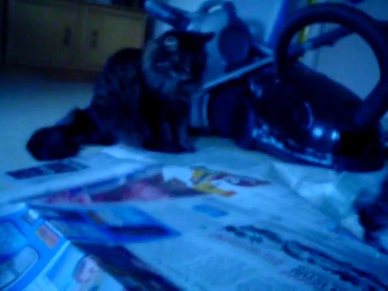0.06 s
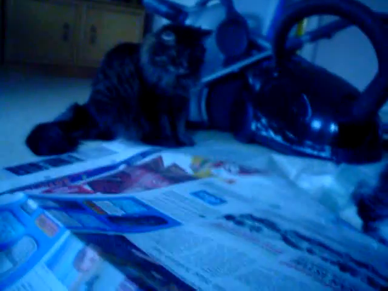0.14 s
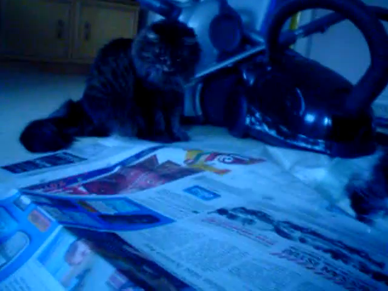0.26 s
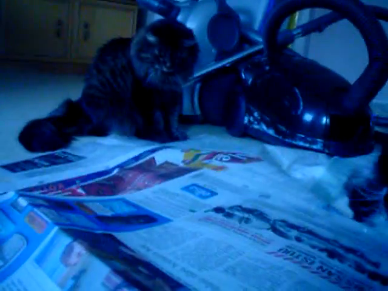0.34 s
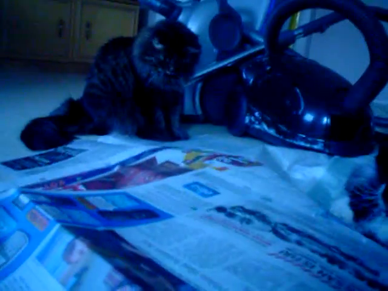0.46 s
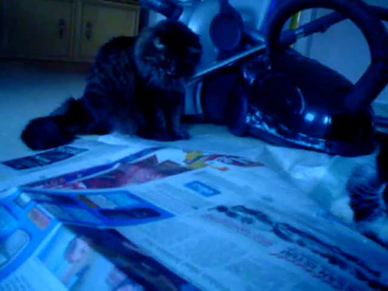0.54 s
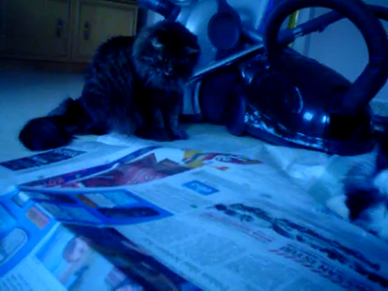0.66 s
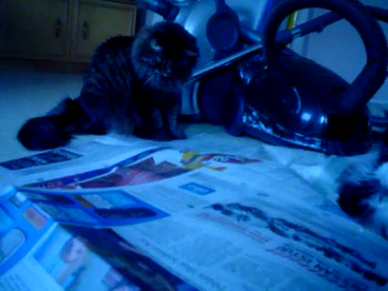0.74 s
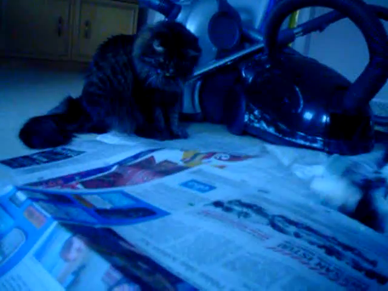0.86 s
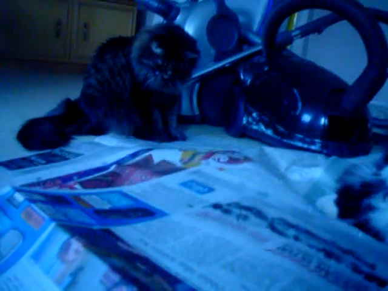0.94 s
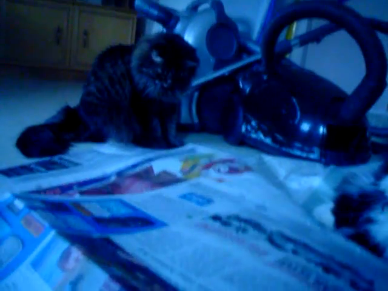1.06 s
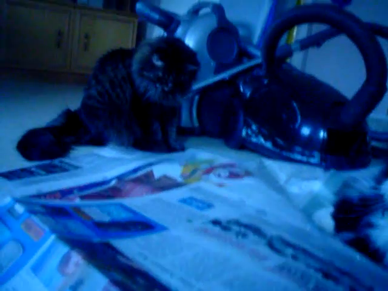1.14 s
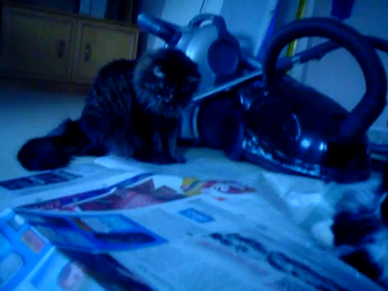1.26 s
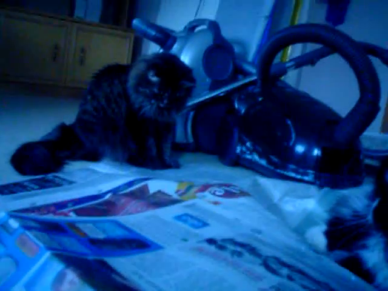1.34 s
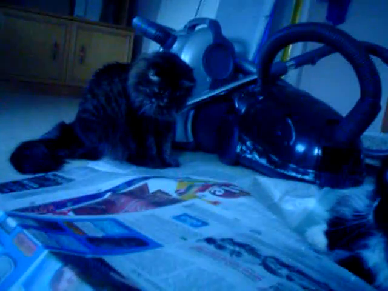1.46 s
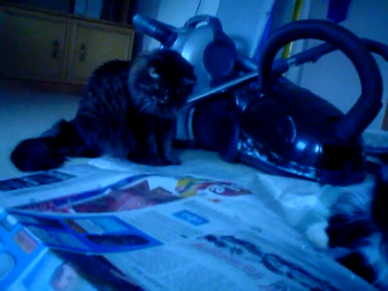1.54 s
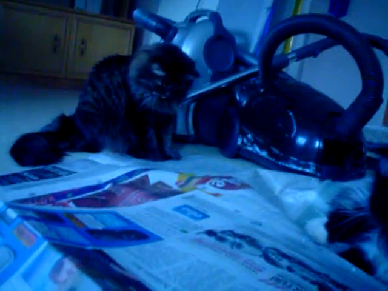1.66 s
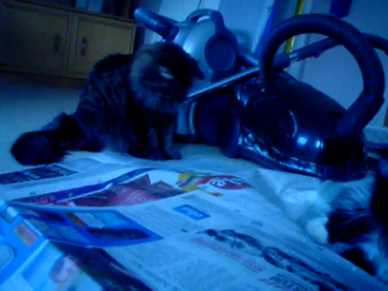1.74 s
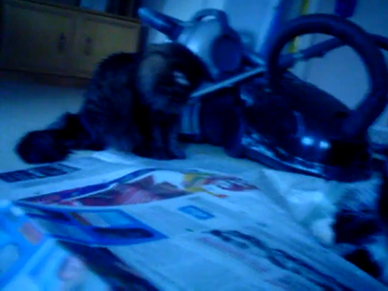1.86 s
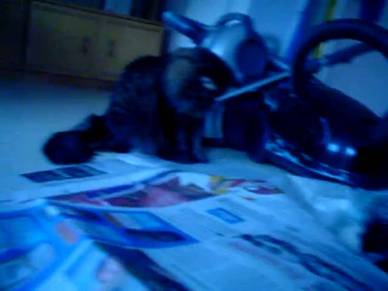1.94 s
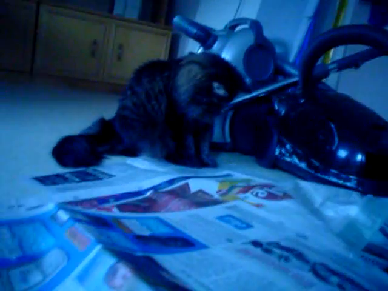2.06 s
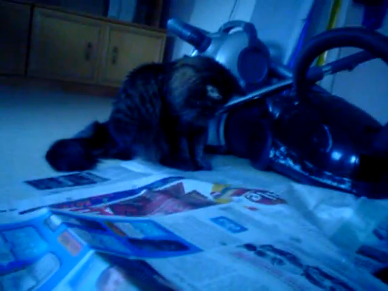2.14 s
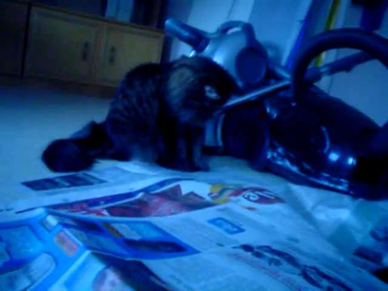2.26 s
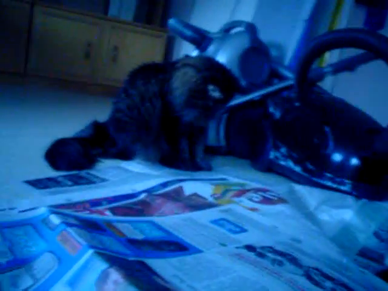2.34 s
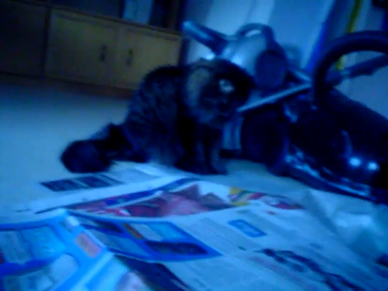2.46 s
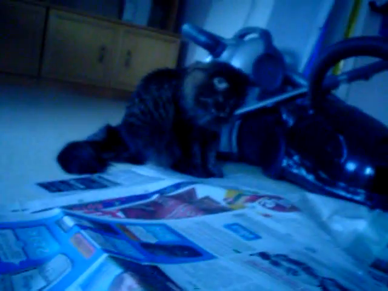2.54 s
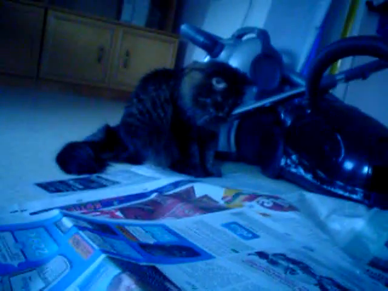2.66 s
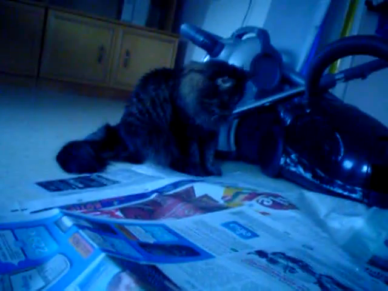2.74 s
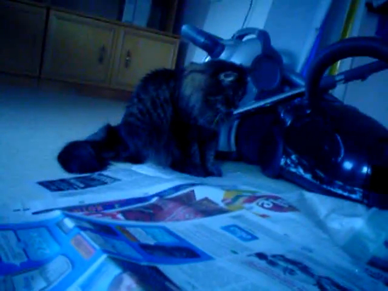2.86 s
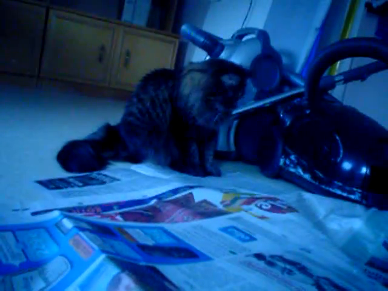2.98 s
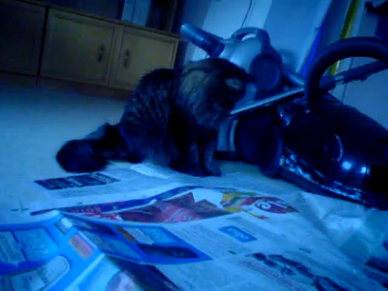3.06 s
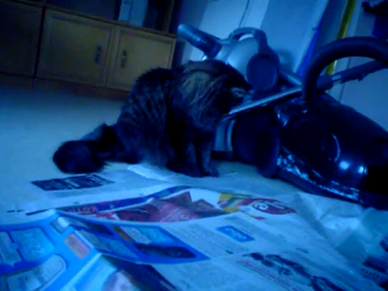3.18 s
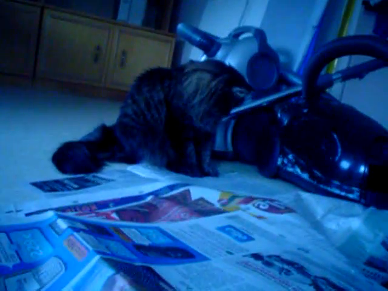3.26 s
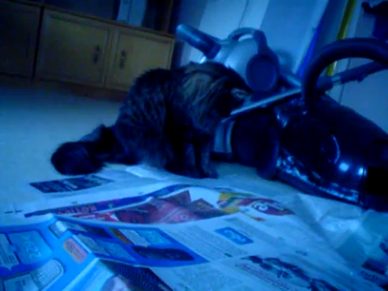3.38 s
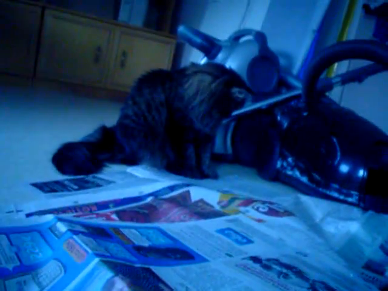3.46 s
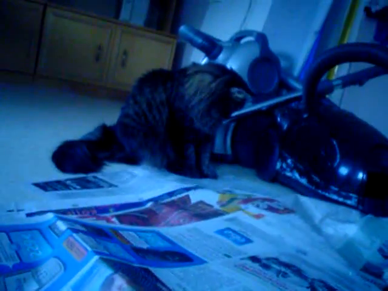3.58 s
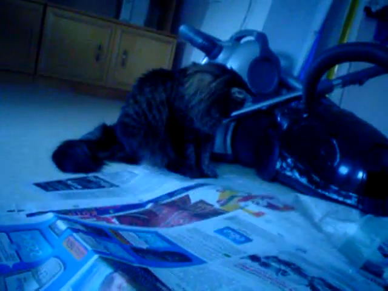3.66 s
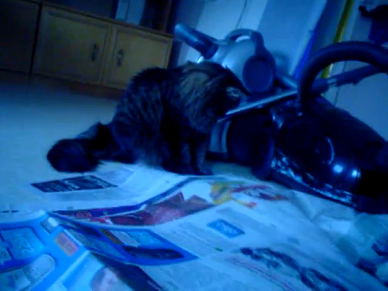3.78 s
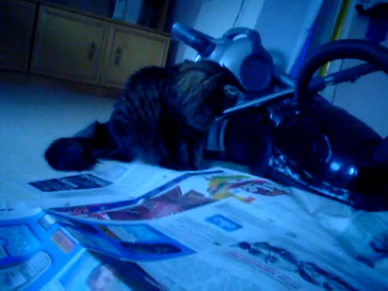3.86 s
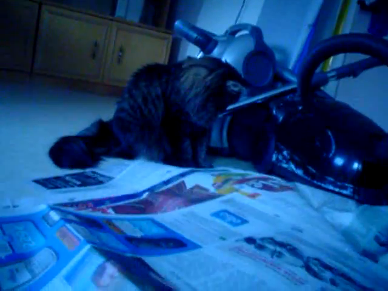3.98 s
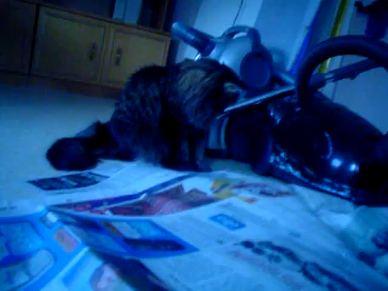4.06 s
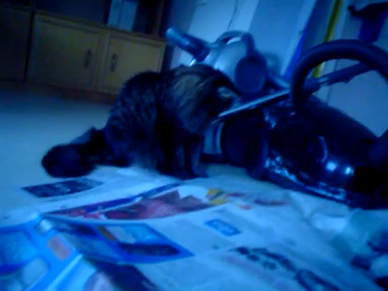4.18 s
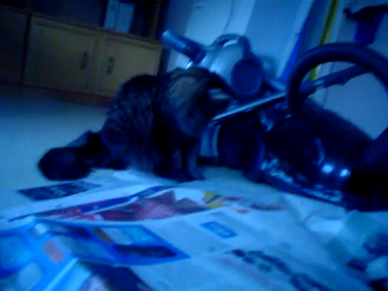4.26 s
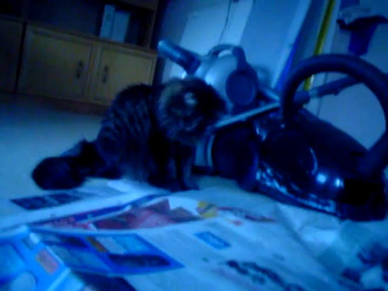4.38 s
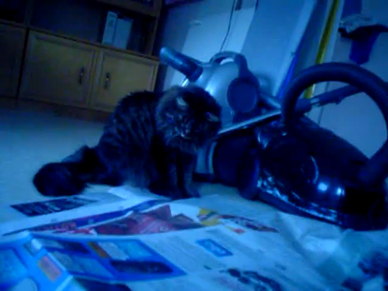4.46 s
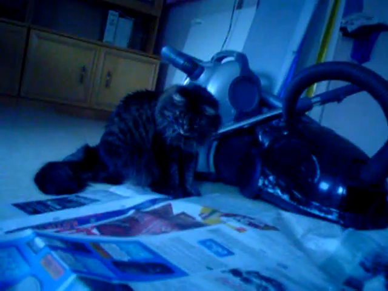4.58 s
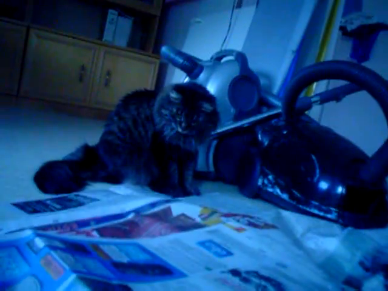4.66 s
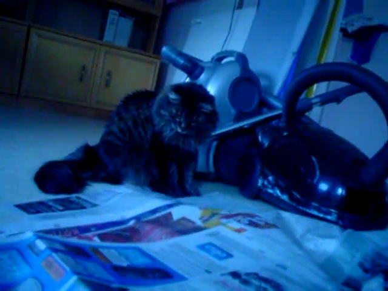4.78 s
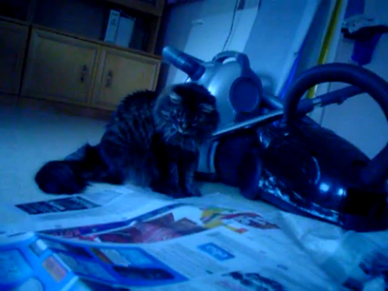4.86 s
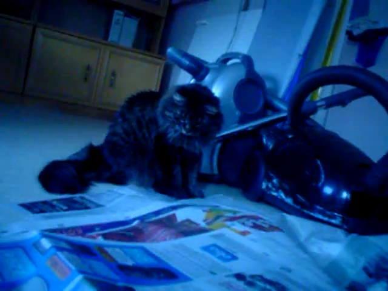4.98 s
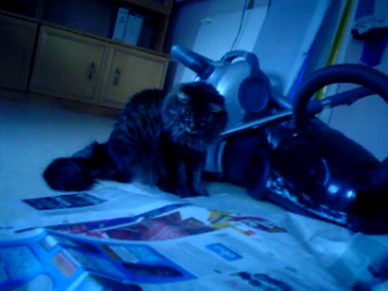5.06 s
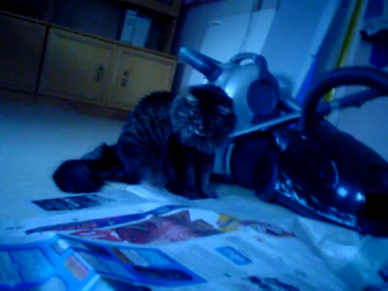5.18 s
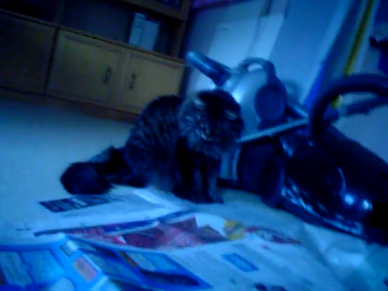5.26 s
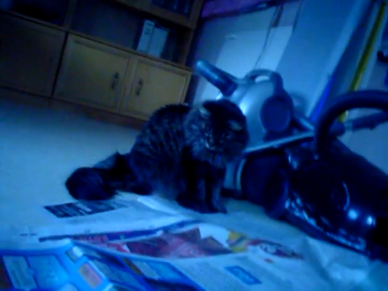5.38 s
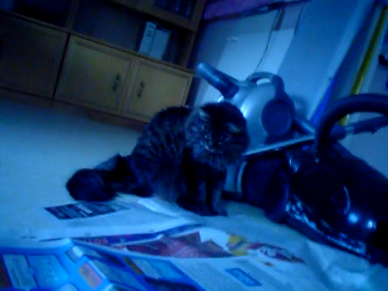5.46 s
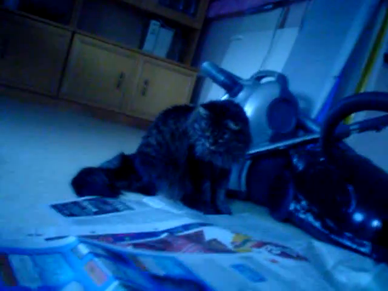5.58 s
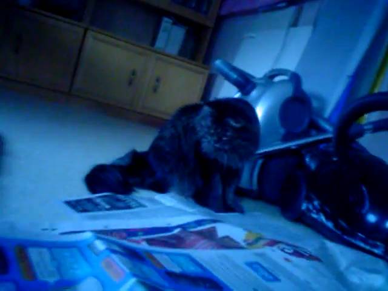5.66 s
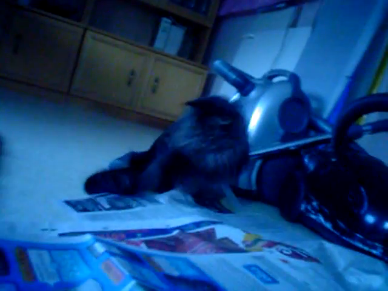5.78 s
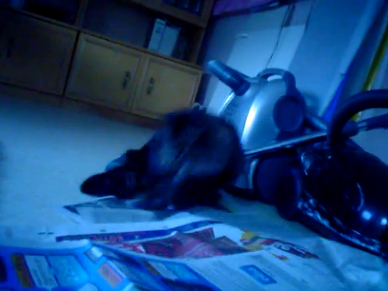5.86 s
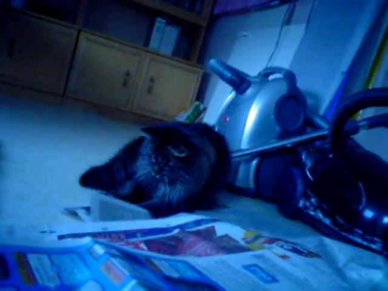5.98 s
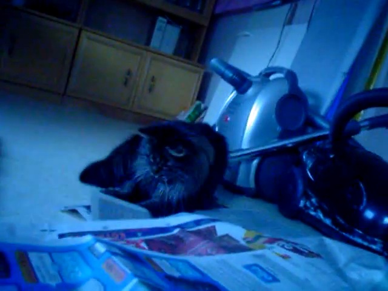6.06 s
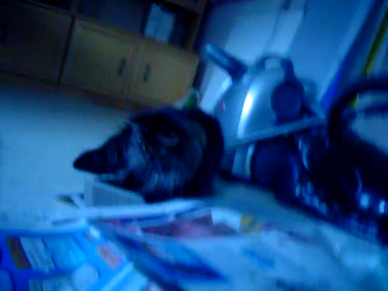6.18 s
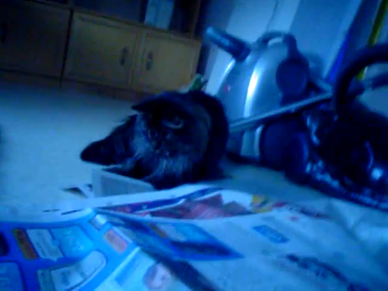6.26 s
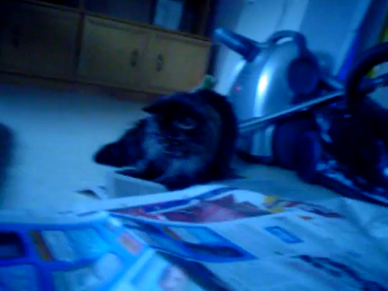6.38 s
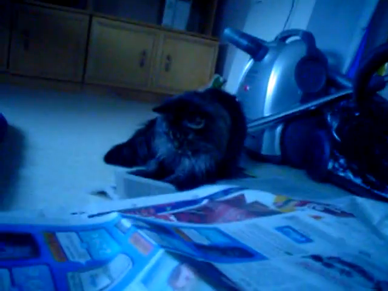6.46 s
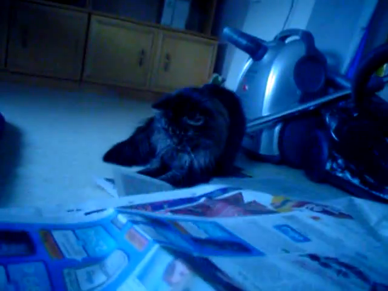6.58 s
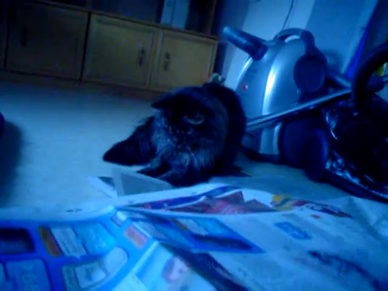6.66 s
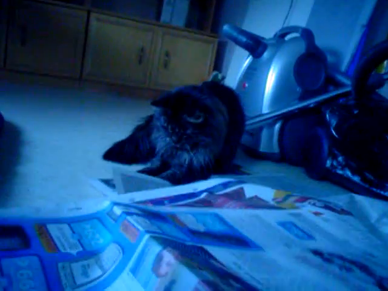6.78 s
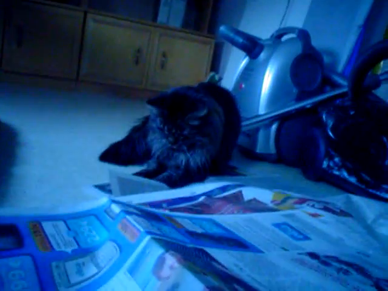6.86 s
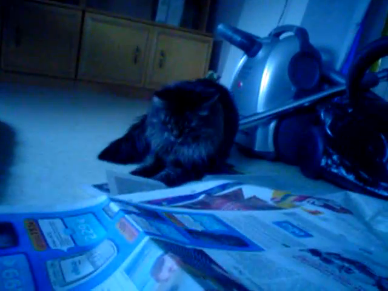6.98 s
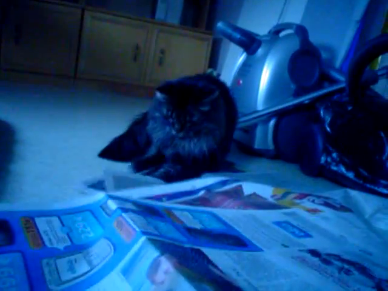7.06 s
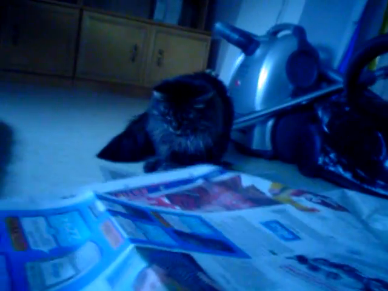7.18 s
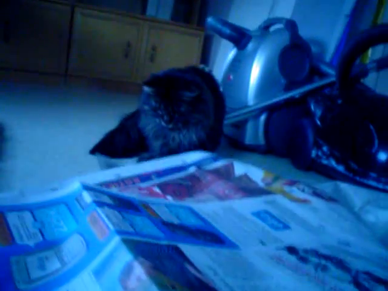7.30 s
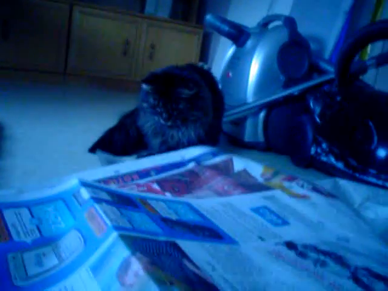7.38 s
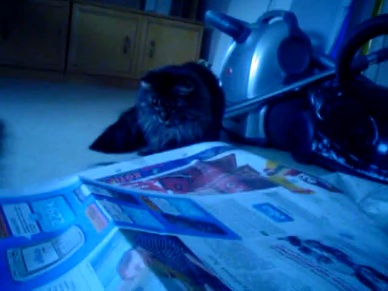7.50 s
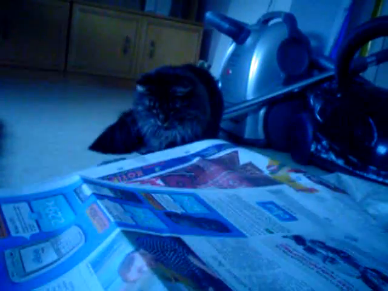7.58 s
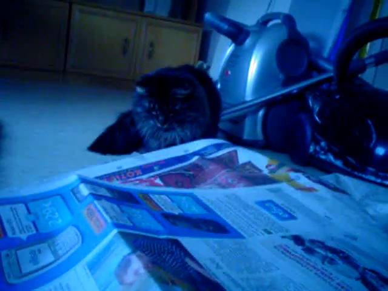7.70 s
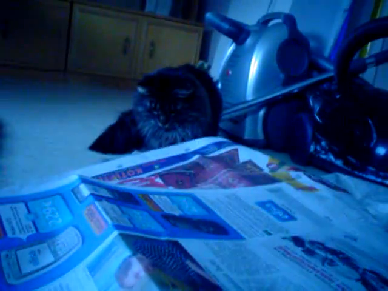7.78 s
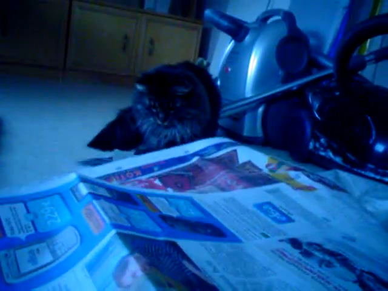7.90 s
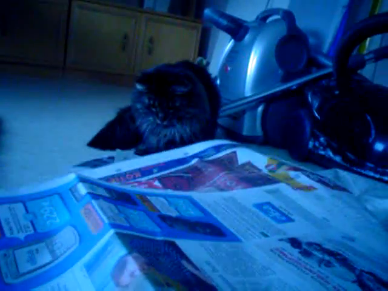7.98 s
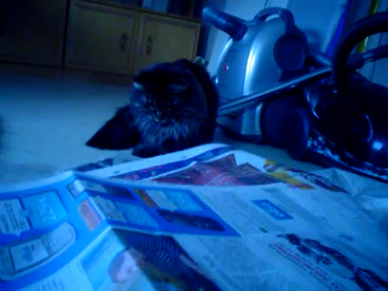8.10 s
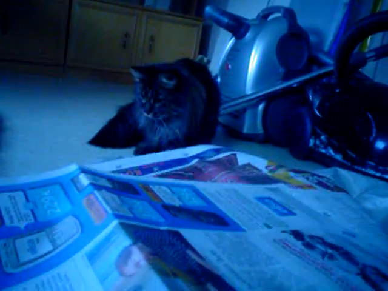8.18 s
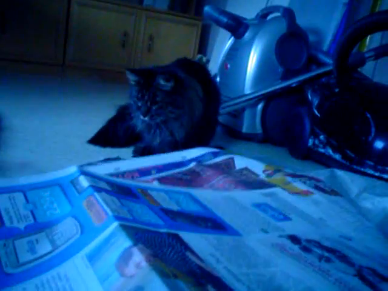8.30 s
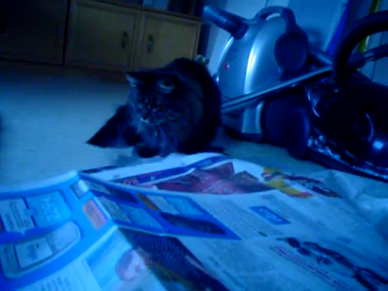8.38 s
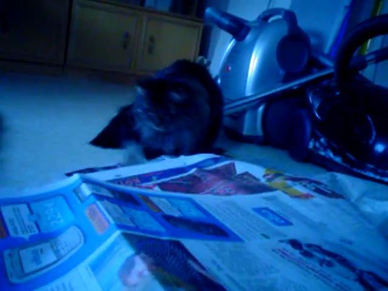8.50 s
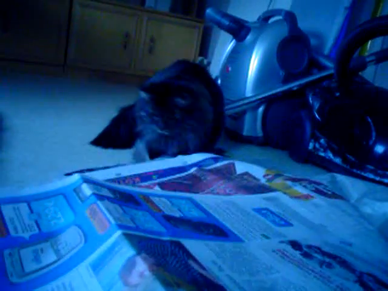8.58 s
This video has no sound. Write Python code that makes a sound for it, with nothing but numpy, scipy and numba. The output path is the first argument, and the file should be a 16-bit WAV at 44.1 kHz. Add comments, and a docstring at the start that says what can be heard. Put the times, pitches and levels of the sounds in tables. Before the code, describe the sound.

A quiet room with soft, low microphone hiss and a short, dry room answer. Close by, newspaper sheets crackle on a hard floor. From 0 to 1 s there are brisk rustles and sharp snaps, strongest around 0.3 s. From 1 to 3.4 s the movement thins to light sliding and isolated small ticks; a faint, thin, mid-pitched whine runs from about 2.1 to 3.4 s, sagging twice near its end. At 3.6 to 4.3 s a denser crunching burst arrives, then smaller ticks and rustles with soft, dull paw thuds around 4.7 to 5.2 s. At about 5.9 s comes the loudest, brightest cluster of tearing snaps, slightly overloaded, over padded thuds. Uneven crackles follow, growing strong again from 6.7 s, with hard snaps near 7.55, 7.65, 8.1 and 8.45 s, and rustling continues to the end at about 8.6 s.

```python
"""Quiet room, hard floor: loose newspaper sheets are pushed about and pawed at close to a small microphone.
Buckling creases are dense tiny ringing grains plus noise; single loud snaps are torn noise through resonances.
Wide sheets drone below, creases hiss above; soft paw falls thud and a faint sine whine passes.
A short noise tail answers as the room; the microphone bends the loudest bursts lopsidedly."""
import sys
import numpy as np
from scipy import signal
from scipy.fft import rfft, irfft
from scipy.io import wavfile
from scipy.ndimage import uniform_filter1d
from numba import njit

SR = 44100
rng = np.random.default_rng(int(sys.argv[2]) if len(sys.argv) > 2 else 0)


def unload_audio(sound):
    """Save the sound as a 16-bit wav file, at the path given as the first command line argument."""
    columns = np.transpose(np.atleast_2d(sound))
    # keep every value between -1 and 1, then stretch to whole-number steps
    steps = np.round(np.clip(columns, -1, 1) * 32767)
    wavfile.write(sys.argv[1], SR, steps.astype(np.int16))


N = 381018  # samples


def undb(db):
    """Amplitude ratio of a level in dB."""
    return 10 ** (np.asarray(db) / 20)


def unit(x):
    """Scale to rms 1."""
    return x / np.sqrt(np.mean(x ** 2))


def sos_filter(x, order, cut_hz, kind="low"):
    """Butterworth filter."""
    return signal.sosfilt(signal.butter(order, cut_hz, kind, fs=SR, output="sos"), x)


def colour(x, points):
    """Minimum-phase filter with the gain of (Hz, dB) points, from the folded cepstrum."""
    hz, db = np.transpose(points)
    grid_hz = np.maximum(np.arange(2049) * SR / 4096, 1)
    log_gain = np.interp(np.log(grid_hz), np.log(hz), db) * np.log(10) / 20
    cepstrum = irfft(log_gain)
    cepstrum[1:2048] *= 2
    cepstrum[2049:] = 0
    impulse = irfft(np.exp(rfft(cepstrum)))[None, :2048]
    return signal.fftconvolve(np.atleast_2d(x), impulse, axes=1)[:, :np.shape(x)[-1]]


# band limits: body | crackle | hiss [f/Hz]
BAND_EDGES_HZ = (1420, 5000)


def bands(x):
    """Low-, band- and high-pass three rows into body, crackle and hiss."""
    low_hz, high_hz = BAND_EDGES_HZ
    body = sos_filter(x[0], 3, low_hz)
    crackle = sos_filter(x[1], 3, (low_hz, high_hz), "band")
    hiss = sos_filter(x[2], 3, high_hz, "high")
    return np.array([body, crackle, hiss])


def walk(rate_hz):
    """Random levels held 1 / rate_hz s and slewed; rms 1."""
    hold = int(SR / rate_hz)
    steps = np.repeat(rng.standard_normal(N // hold + 1), hold)
    return unit(uniform_filter1d(steps, hold // 2 + 1)[:N])


# sheets sliding lightly between pushes: [t/s, crackle level/dB]
SLIDE_LEVELS = [(0.0, -39), (0.45, -46), (0.85, -46.5), (1.5, -53.5), (2.3, -48.5), (2.9, -59), (3.5, -50),
                (4.0, -61), (4.48, -56.5), (4.6, -46.5), (5.0, -65.5), (5.75, -49.5), (6.2, -50),
                (6.45, -54.5), (7.0, -41.5), (7.8, -57.5), (8.05, -42), (8.6, -42)]
# paw pushes: [peak t/s, crackle level/dB, swell by 10 dB/s, fade by 10 dB/s]; times below 5 ms act as 5 ms
PAW_PUSHES = [(0.286, -28.5, 0.01, 0.0826), (0.749, -36, -0.07, -0.24), (0.992, -34, 0.07, 0.0458),
              (1.113, -39.5, 0.04, -0.18), (1.252, -42.5, 0.1, -0.11), (1.417, -43, 0.07, 0.07),
              (1.759, -47, 0.05, -0.04), (1.892, -44.5, 0.17, 0.06), (2.051, -45, 0.1, 0.12),
              (2.167, -45.5, 0, 0.1), (2.476, -40, 0.05, 0.04), (2.55, -41.5, 0.04, 0.05),
              (2.772, -54.5, 0.3, -0.13), (3.198, -41.5, 0.06, -0.18), (3.629, -33, 0.07, 0.25),
              (3.869, -32.5, 0.1165, 0.0667), (4.12, -38, -0.01, -0.01), (4.244, -32.5, 0.09, 0.07),
              (4.774, -37, .05, 0.13), (5.158, -42, -0.22, 0.15), (5.245, -32.5, 0.1, 0.06),
              (5.468, -42.5, -0.2, 0.07), (5.67, -38, 0.04, -0.07), (5.878, -27.5, 0.02, 0.0863),
              (5.969, -29.5, 0.0568, 0.09), (6.318, -42, -0.13, 0.1), (6.548, -39, 0, 0.13),
              (6.73, -31, 0.0839, 0.1), (7.113, -29.5, 0.01, 0.16), (7.273, -32, 0.05, 0),
              (7.549, -23, 0.06, 0.05), (7.663, -31.5, -0.03, 0.02), (7.884, -33.5, 0.065, 0.1),
              (8.219, -38, -0.2, -0.24), (8.464, -23.5, 0.0168, 0.15), (8.63, -31, -0.05, 6)]


def motion():
    """Crackle level in dB: the power of each push swells and fades over the light sliding."""
    t = np.arange(0, N + 64, 64) / SR
    power = undb(2 * np.interp(t, *np.transpose(SLIDE_LEVELS)))
    for peak_s, db, swell_s, fade_s in PAW_PUSHES:
        before = (peak_s - t) / max(swell_s, .005)
        after = (t - peak_s) / max(fade_s, .005)
        power = power + undb(2 * (db - 10 * np.where(t < peak_s, before, after)))
    return np.interp(np.arange(N) / SR, t, 10 * np.log10(power))


@njit
def ring(start, pole, size, count):
    """Add one dying sinusoid per grain, cut off 50 dB down."""
    out = np.zeros(count)
    for k in range(len(start)):
        z = size[k] + 0j
        for i in range(start[k], count):
            out[i] += z.imag
            z *= pole[k]
            if z.real ** 2 + z.imag ** 2 < 1e-5 * size[k] ** 2:
                break
    return out


def buckles(rate_hz, scatter_db, low_hz, high_hz, cycles):
    """Chance buckles of small patches: unequal sizes, each with its own pitch, dying 60 dB in `cycles`."""
    when, size, pitch = rng.random((40000, 3))[:int(rate_hz * N / SR)].T
    hz = low_hz * (high_hz / low_hz) ** pitch
    pole = np.exp((2j * np.pi - np.log(1000) / cycles) * hz / SR)
    steps = np.minimum(-np.log(1 - size), 3.0)
    return unit(ring((when * N).astype(np.int64), pole, undb(scatter_db * steps), N))


BODY_DB, BODY_SLOPE = 0.48, -0.34  # body re crackle at -39.5 dB crackle; change per dB: hard pushes drone less
BODY_TOP_DB = 2  # cap on body re crackle
# paper through the microphone, also used by snaps: [f/Hz, level/dB per Hz]
PAPER_COLOUR = [(29, -61.5), (50, -37.5), (119, -22.5), (189, -16.5), (235, -15.5), (305, -8.5), (420, -11),
                (560, -10), (954, -3), (1490, -7), (2640, 1.5), (8370, -7), (10000, -12), (13000, -99)]


def rustle():
    """Sliding friction under a rain of small buckles; all bands share the jerks of the paw."""
    db = motion()
    body_db = np.minimum(BODY_DB + BODY_SLOPE * (db + 39.5), BODY_TOP_DB)
    hiss_db = -5.5 - 0.36 * (db + 36.5)  # light sliding is the brightest
    jerk_db = 0.95 * walk(45) + 1.74 * walk(110)

    wide = buckles(rate_hz=500., scatter_db=1.5, low_hz=531.0, high_hz=1270.0, cycles=8.1)
    small = buckles(rate_hz=700., scatter_db=2.0, low_hz=1410.0, high_hz=9850.0, cycles=22.0)
    ticks = buckles(rate_hz=250., scatter_db=5.5, low_hz=1790.0, high_hz=7000.0, cycles=2.5)

    body_friction = rng.standard_normal(N) * undb(1.8 * walk(20))
    crackle_friction = rng.standard_normal(N) * undb(2.3 * walk(40))
    body = 0.62 * wide + 2.0 * body_friction
    crackle = 0.55 * ticks + 0.83 * small + 1.12 * crackle_friction
    hiss = (0.62 * small + 1.3 * rng.standard_normal(N)) * undb(3.0 * walk(60))

    parts = bands(colour(np.array([body, crackle, hiss]) * undb(jerk_db), PAPER_COLOUR))
    return sum(unit(part) * undb(db + rel_db) for part, rel_db in zip(parts, (body_db, 0, hiss_db)))


ROOM_T60_S, ROOM_DB = 0.14, -16


def room(x):
    """Dense decaying reflections, duller than the direct sound."""
    t = np.arange(int(.4 * SR)) / SR
    tail = rng.standard_normal(len(t)) * undb(-60 * t / ROOM_T60_S) * (t > .003)
    tail = signal.lfilter([1], [1, -.4], tail)
    return signal.fftconvolve(x, undb(ROOM_DB) * tail / np.sqrt(np.sum(tail ** 2)))[:N]


HUSH_DB = -50
# room air and microphone hiss: [f/Hz, level/dB per Hz]
HUSH_COLOUR = [(18, -19.5), (30, -10.5), (281, 4), (435, 4), (760, 10), (1020, 7), (1430, -5.5), (2760, -2),
               (8230, -17.5), (10000, -14), (13000, -53.5)]


def hush():
    """Room air and microphone hiss: coloured noise, slightly mottled."""
    return undb(HUSH_DB + 1.3 * walk(17.0)) * unit(colour(rng.standard_normal(N), HUSH_COLOUR)[0])


# creases that snap or tear loose: [peak t/s, crackle level/dB, body re crackle/dB, hiss re crackle/dB,
# rise from -8 dB/ms, crackle fall by 8 dB/ms]; levels before SNAP_TRIM_DB
CREASE_SNAPS = [(0.095, -25.5, -2, -4.5, 2, 5.3), (0.163, -22, -6, -3.5, .8, 2.9),
                (0.2624, -28, -9, -8, 1, 3.5), (0.281, -25.5, -0.5, -12.5, 22, 6),
                (0.2953, -29, 6, -21, 6.8, 2.7), (0.319, -14.5, -6, -15, 3, 1.7),
                (0.3366, -28, 1, -26, 4, 4), (0.49, -20.5, -4, -4, 0.9, 4.1),
                (0.551, -23.5, -3, -9, 2.1, 2.2), (0.7167, -34.5, 11, -1, 2.3, 1.1),
                (0.8013, -37.5, 11.5, -16, 1.3, 1.3), (0.876, -32.5, -6, -4, 1.1, 3),
                (0.99, -24.5, 9, -9, 0.53, 1.3), (1.2526, -33, -2, -14, 1, 5.1),
                (1.4897, -31.5, 6, -23, 0.95, 1.9), (1.5466, -29, -2, -13, 1.1, 5),
                (2.0416, -32, 1, -9, 1.1, 4.9), (2.1576, -32.5, 2, -11, 1, 4.9),
                (2.4726, -26.5, -2, -25, 5.9, 7.3), (2.5367, -28.5, -4, -20, 0.81, 3.4),
                (2.5489, -39, 10, -18, 2.6, 7.2), (2.7612, -39, -5, -15, 1, 5),
                (2.86, -35.5, -0.5, -7.5, 2.6, 4.6), (3.0206, -43, 8, -16, 1, 2.6),
                (3.101, -28.5, -16, -3, 1.7, 3.2), (3.22, -33, 0, -10, 1, 3.3),
                (3.5645, -32, 3.5, -9, 3.7, 3.8), (3.601, -24, -1.5, -8, 4.3, 5.7),
                (3.6448, -26.5, -4, -3, 12, 1.9), (3.658, -15, -13, -16, 0.56, 0.5),
                (3.667, -27, -10, -9, 4.2, 31), (3.7236, -28, -4, -2.5, 1, 2), (3.752, -25, -7, -8, 2, 3),
                (3.8009, -26, 1, -5, 1, 1.8), (3.826, -20, -6, -9, 13, 6.3),
                (3.847, -23, 1.5, -17, 2.5, 4.1), (3.872, -16, 1.5, -8, 6.7, 9.2),
                (3.9152, -13, -6.5, -8, 1.3, 8.8), (4.114, -31, 0, -11, 6.3, 5),
                (4.161, -31, 0.5, -19, 1.5, 11), (4.2335, -22, 0, -8, 2.9, 18),
                (4.2488, -24.5, 0.5, -7, 22, 5.6), (4.3586, -30, 1, -20, 3.8, 2.5),
                (4.3666, -29.5, -1, -24, 1.7, 2.2), (4.398, -38.5, 4.5, -19, 4.7, 3),
                (4.44, -34.5, -1, -20, 1.6, 1.5), (4.4617, -35, 4.5, -28, 2.2, 2.6),
                (4.766, -32.5, 4.5, -1, 3.3, 6.5), (4.786, -34.5, 5, -7, 6, 6),
                (4.8284, -25.5, -8, -28, 2, 3.1), (4.842, -33.5, 8.5, -15, 1, 1.5),
                (4.871, -34.5, 14, -13, 1.2, 0.78), (4.9031, -31.5, 3, -20, 3.3, 2.9),
                (4.9259, -29, -0.5, -27, 2.1, 6.2), (4.9324, -27.5, -3, -2.5, 2.2, 1.2),
                (5.0802, -30, -1, -12, 3.3, 9.9), (5.1112, -25.5, -1, -24, 2.9, 5.6),
                (5.152, -28.5, 4, -2, 0.66, 2.6), (5.166, -24.5, -2, -2.5, 6.2, 2.1),
                (5.199, -31, -1, -8, 1, 3), (5.2278, -30.5, 8, -3, 2.2, 5.4), (5.251, -28, 0, -5, .6, 2),
                (5.4422, -29, 1, -15, 1.1, 13), (5.6096, -35.5, 7, -6, 6.9, 2.8),
                (5.645, -34, 13.5, -9, 5, 0.68), (5.664, -24, -4, -6, 0.96, 2.3),
                (5.724, -28.5, -2.5, -12, 5.9, 2.4), (5.7689, -28, -1, -19, 0.99, 1.8),
                (5.864, -7, -14, -4, 3.6, 6), (5.872, -14.5, -13, -10, 2.6, 23),
                (5.8971, -9.5, -18, -3.5, 4, 3.2), (5.9065, -15, -11, -4, .6, 2.5),
                (5.9332, -20, -15, 1, .4, 0.65), (5.942, -16, -10, -4.5, 2, 8.6),
                (5.9483, -15.5, -12, -11, 3, 9.1), (5.9592, -15, -2, -8, .8, 2.2),
                (5.9695, -16.5, -11.5, -3.5, 9.8, 24), (5.981, -19, -17, 3, 1.3, 1.5),
                (6.005, -19, -16.5, 5, 1, 9), (6.145, -29.5, -13, -10, 1.9, 5.3),
                (6.227, -28.5, -14, -10, 6, 2.4), (6.239, -29, 0.5, -9, 1, 2.7),
                (6.306, -24, -11, -6.5, 0.99, 2.5), (6.318, -27, -7, -24, 0.98, 3.8),
                (6.4075, -35, 4, -25, 1.2, 5.2), (6.5398, -25.5, -11, -9, 1, 6.3),
                (6.552, -21.5, -14, -9.5, 1.5, 5.1), (6.603, -33, -11.5, -11, 1, 3.7),
                (6.681, -26, 0, -3, 4.8, 13), (6.714, -27, 1, -6, 5.4, 3.2),
                (6.7311, -19.5, -4, -10, 0.98, 6.2), (6.779, -32, 8.5, -16, 1.1, 9.4),
                (6.808, -28, 5, -14, 10, 12), (6.8484, -15, -29.5, -13, 1, 1.2),
                (6.8866, -15, -4, -14, 1.5, 2.3), (6.965, -33.5, -2, -8, 1, 3),
                (7.0021, -30, -0.5, -23, 2.5, 20), (7.0216, -31, 7, -19, 3.4, 2.7),
                (7.086, -20, -25, -6.5, 0.8, 13), (7.1452, -20, -13, -2, 1.4, 3.7),
                (7.171, -15, -13, -11, 1.4, 4.3), (7.2014, -21.5, -3, -5, 1, 7.1),
                (7.275, -15, -10.5, -5, 0.63, 4.9), (7.3274, -24, -4, -7, 1, 2.8),
                (7.385, -31, 1, -10, 1, 3), (7.464, -22.5, -23.5, -5, 0.9, 1.9),
                (7.5166, -18.5, -3.5, -6, 2, 7.8), (7.5439, -10, -5.5, -7, 2.9, 3.6),
                (7.563, -20.5, 2.5, -11, 1.2, 3), (7.592, -20, 1, -7, 0.92, 13),
                (7.618, -31, 11, -15, 3, 3), (7.645, -11, -5, -10, 1.14, 3),
                (7.699, -24.5, -1, -13, 1.8, 4.9), (7.8846, -26, -10, -1.5, 1.4, 3.2),
                (8.0091, -32.5, 7, -20, 2.6, 17), (8.0186, -33, 4, -8, 8.1, 3.8),
                (8.0729, -23.5, -1.5, -14, 1.3, 3.6), (8.119, -16.5, -1, -10, 3, 2),
                (8.1273, -22, -2.5, -29, 6.5, 3), (8.1496, -15.5, -8.5, -2.5, 0.57, 3.3),
                (8.162, -19, -10, -4, 2.8, 2.7), (8.2216, -23, -7.5, -13, 2.3, 8.6),
                (8.323, -30, -8, -16, 0.97, 3), (8.4, -25, -22, -17, 0.99, 6.8),
                (8.443, -19, -20, -1.5, 12.4, 7.8), (8.4537, -20.5, -16, 4, 14, 7.9),
                (8.4669, -16.5, -19, -23, 13, 9), (8.523, -25, 4, -14, 1.6, 7)]
SNAP_TRIM_DB = -2.8


def snaps():
    """Each snap swells to a hard tick and rattles away; the wide sheet rings on longer than the crease."""
    count, lead, size = len(CREASE_SNAPS), int(.04 * SR), int(.13 * SR)
    ms = (np.arange(size) - lead) / SR * 1000
    drive = np.zeros((3, N + size))
    # each snap rings a patch and a crease of its own size
    patches_hz = 610.0 * 1.85 ** rng.random(count)
    creases_hz = 2176.0 * 1.95 ** rng.random(count)
    # fibres tear in clicks
    rattles = rng.standard_normal((count, size)) * undb(2.57 * rng.exponential(size=(count, size)))

    for snap, rattle, patch_hz, crease_hz in zip(CREASE_SNAPS, rattles, patches_hz, creases_hz):
        peak_s, db, body_db, hiss_db, rise_ms, fall_ms = snap
        start = int(peak_s * SR)
        rise_db = -8.0 * (ms / max(rise_ms, .2)) ** 2
        # short, abrupt snaps tick hardest
        tick_size = 5.7 / (1 + (rise_ms / 1.9) ** 2 + (fall_ms / 6.1) ** 2)
        tick = np.sign(rattle[lead]) * tick_size * (ms == 0)
        rels_db = (body_db, 0, hiss_db)
        peaks_hz = (patch_hz, crease_hz, 2 * crease_hz)
        for row, rel_db, stretch, peak_hz in zip(drive, rels_db, (1.4, 1, .8), peaks_hz):
            fall_db = -8.0 * ms / (max(fall_ms, .3) * stretch)
            shape = undb(np.where(ms < 0, rise_db, fall_db))
            # burst energy set by the envelope alone
            even = rattle * np.sqrt(np.sum(shape ** 2) / np.sum((shape * rattle) ** 2))
            burst = 0.6 * shape * even + tick
            resonance = signal.lfilter(*signal.iirpeak(peak_hz, 2.5, SR), burst)
            rung = burst + 1.6 / (1 + peak_hz / 1500) * resonance
            row[start:start + size] += undb(db + rel_db + SNAP_TRIM_DB) * rung

    drive = drive[:, lead:N + lead] * undb(1.5 * walk(400))  # the rattle is lumpy
    impulse = 1. * (np.arange(8192) == np.zeros((3, 1)))
    # gain of the paper colour in each band
    gains = np.sqrt(np.sum(bands(colour(impulse, PAPER_COLOUR)) ** 2, axis=1))
    return (bands(colour(drive, PAPER_COLOUR)) / gains[:, None]).sum(axis=0)


# faint whine: [t/s, f/Hz, rms level/dB]
WHINE_TRACK = [(2.1, 751, -70), (2.2, 756, -52.5), (3.02, 753, -53), (3.06, 743, -48), (3.14, 680, -65),
               (3.17, 700, -79.5), (3.2, 767, -50), (3.25, 766, -47), (3.32, 692, -61), (3.38, 680, -82)]


def whine():
    """A thin sine that holds its pitch, then sags twice."""
    s, hz, db = np.transpose(WHINE_TRACK)
    t = np.arange(N) / SR
    hz, db = np.interp(t, s, hz), np.interp(t, s, db)
    return np.sqrt(2) * undb(db) * np.sin(2 * np.pi * np.cumsum(hz) / SR)


# soft paw falls on the floor under the sheets: [t/s, level/dB, lower centre f/Hz, t60/s]
PAW_THUDS = [(2.317, -49, 151, 0.094), (4.713, -49, 245, 0.17), (4.871, -46, 151, 0.24),
             (5.08, -46, 254, 0.081), (5.225, -43, 150, 0.18), (5.855, -41, 296, 0.088),
             (5.935, -40, 300, .2)]


def thuds():
    """A padded push and scuff stirs two dull resonances of the floor."""
    t = np.arange(N) / SR
    out = np.zeros(N)
    for (start_s, db, hz, t60_s), scuff in zip(PAW_THUDS, rng.standard_normal((len(PAW_THUDS), N))):
        age_s = np.maximum(t - start_s, 0)
        lower = sos_filter(scuff, 2, (0.82 * hz, 1.38 * hz), "band")
        upper_hz = 1.85 * hz
        upper = sos_filter(.8 * scuff, 2, (0.82 * upper_hz, 1.38 * upper_hz), "band")
        swell = undb(-60 * age_s / t60_s) * (1 - np.exp(-age_s / 0.049))
        out += undb(db) * swell / swell.max() * unit(lower + upper)
    return out


def scene():
    """Paper and thuds with their room answer, plus whine and hush."""
    paper = rustle() + snaps() + thuds()
    return (paper + room(paper) + whine() + hush())[None]


OVERLOAD = 0.03  # rectified treble amplitude where the input stage starts to shift
TOP_HZ = 10050


def record(dry):
    """Sustained bright overload shifts the input stage, leaving a slow bump; then coupling high-pass, top cut."""
    bent = np.tanh(1.198 * dry) / 1.161
    bright = sos_filter(dry, 2, 5000, "high")
    rectified = sos_filter(np.abs(bright), 1, 40)
    bump = sos_filter(np.clip(rectified - OVERLOAD, 0, .028), 2, 80)  # one-sided
    wired = sos_filter(bent + 1.15 * bump, 1, 4.5, "high")
    return signal.sosfilt(signal.ellip(10, .3, 75, TOP_HZ, fs=SR, output="sos"), wired)


dry = scene()
out = record(dry)
unload_audio(out)
```